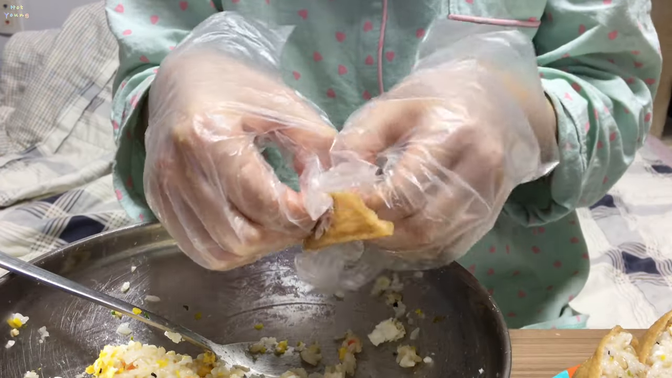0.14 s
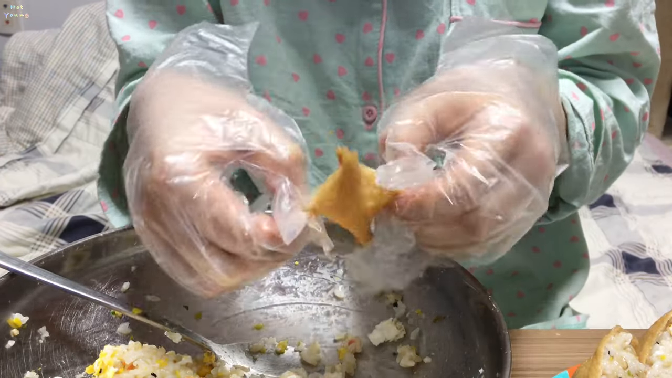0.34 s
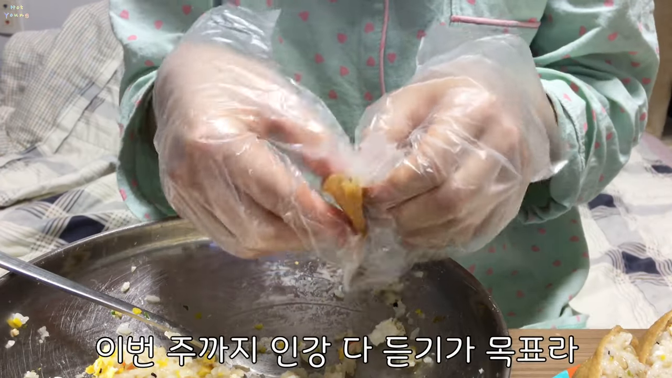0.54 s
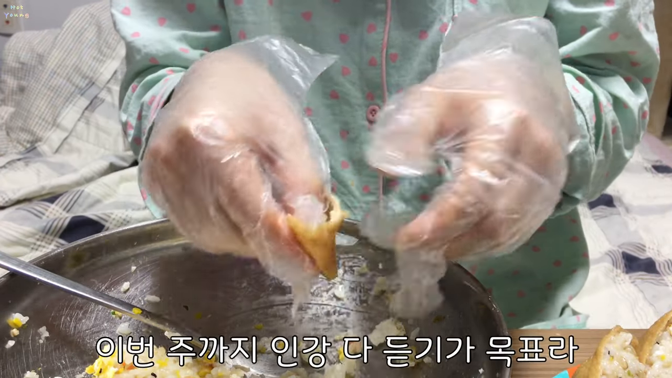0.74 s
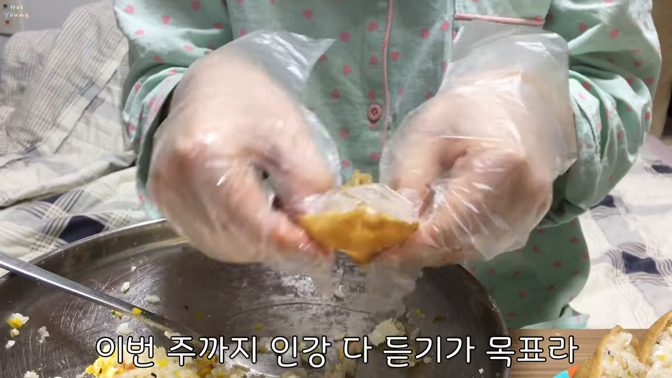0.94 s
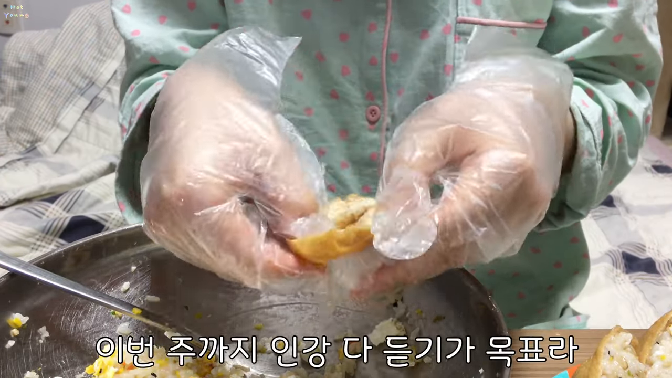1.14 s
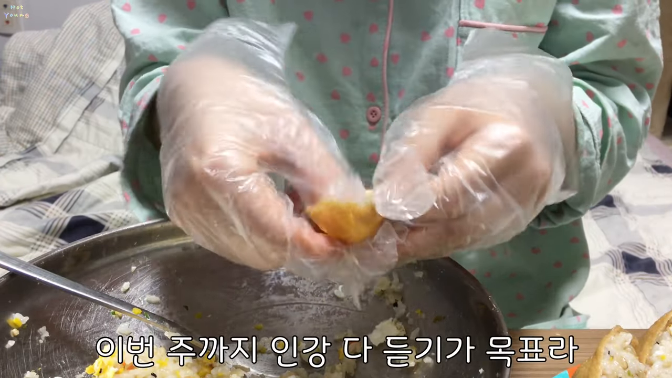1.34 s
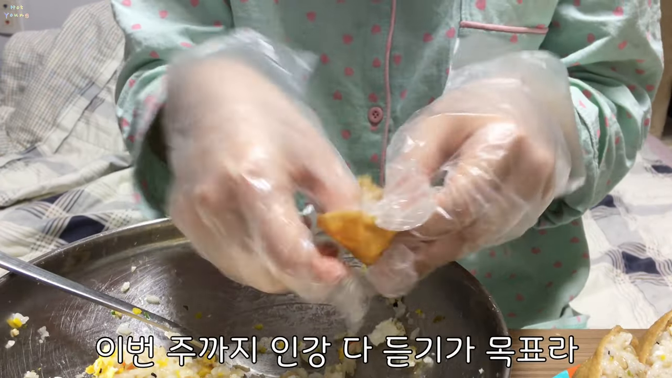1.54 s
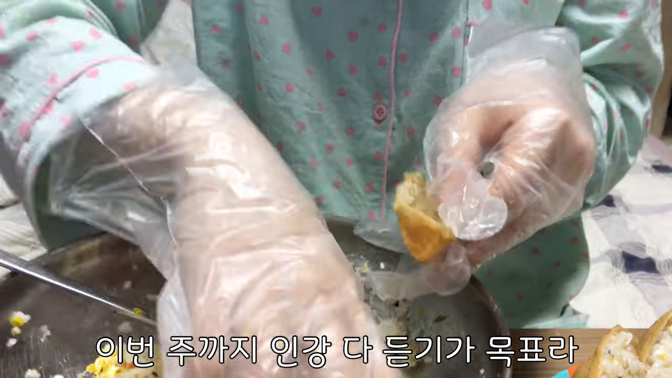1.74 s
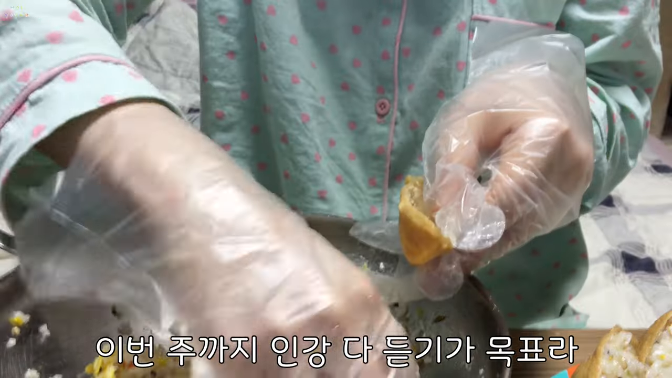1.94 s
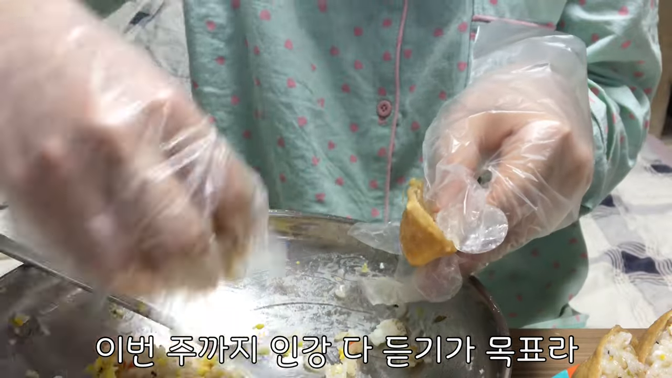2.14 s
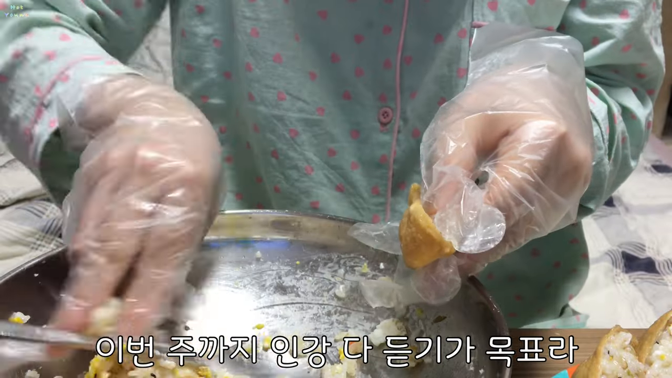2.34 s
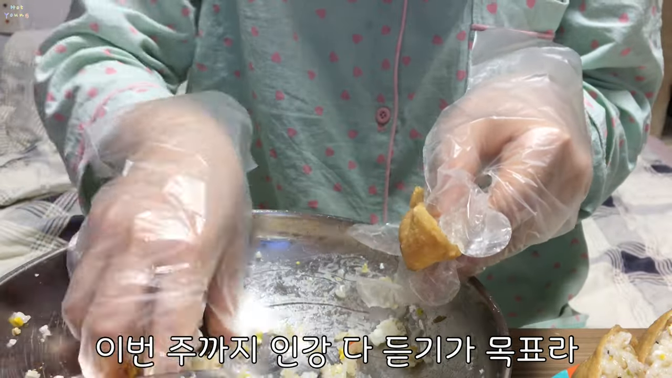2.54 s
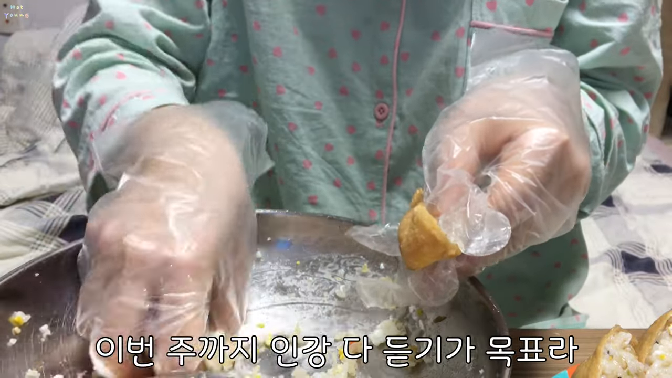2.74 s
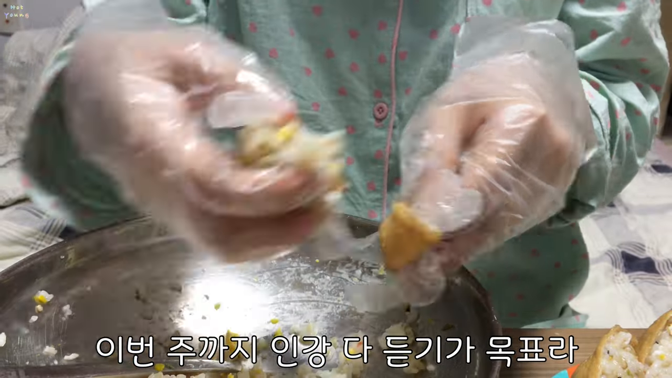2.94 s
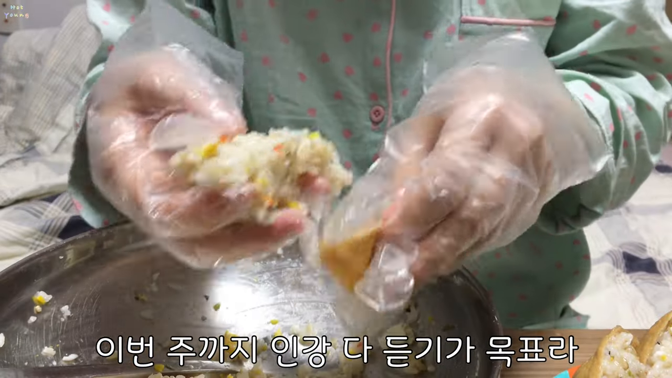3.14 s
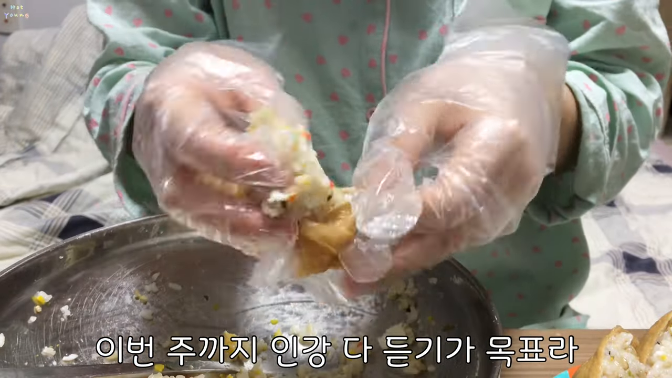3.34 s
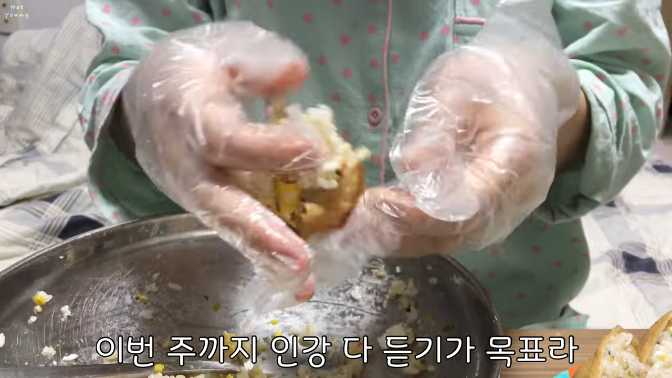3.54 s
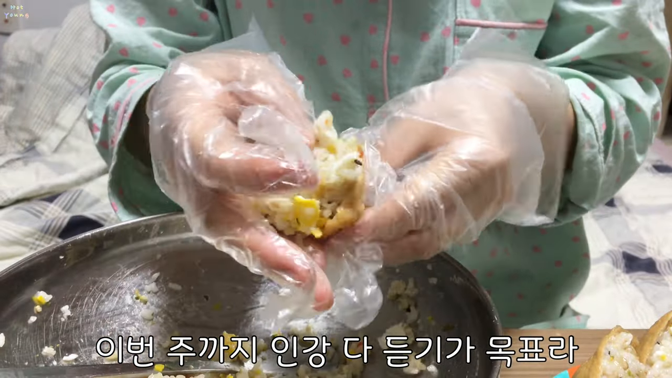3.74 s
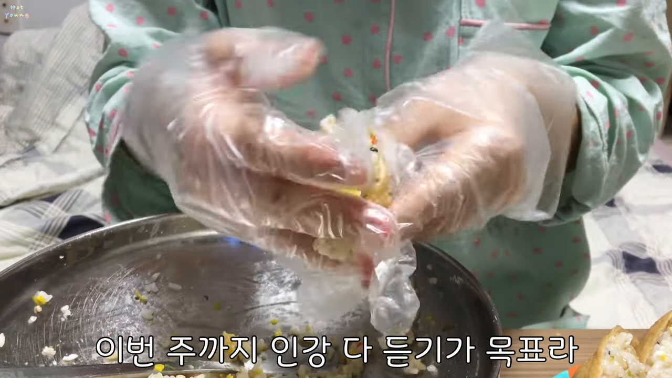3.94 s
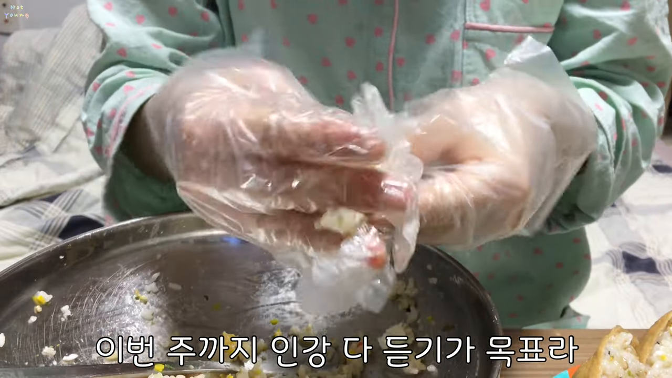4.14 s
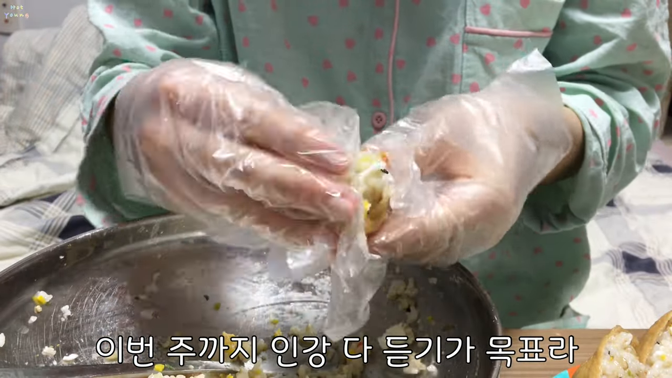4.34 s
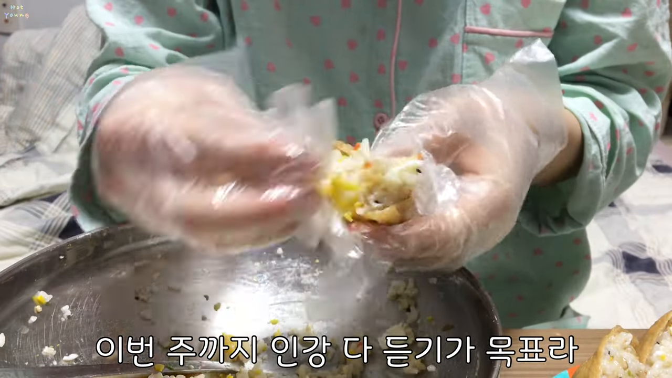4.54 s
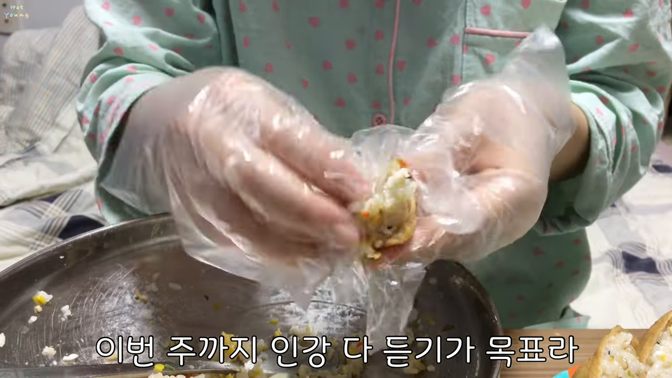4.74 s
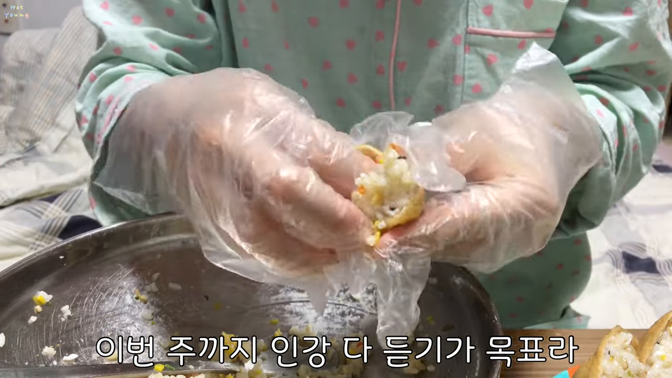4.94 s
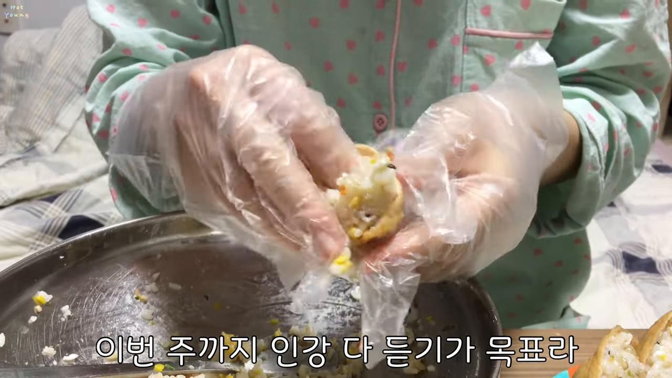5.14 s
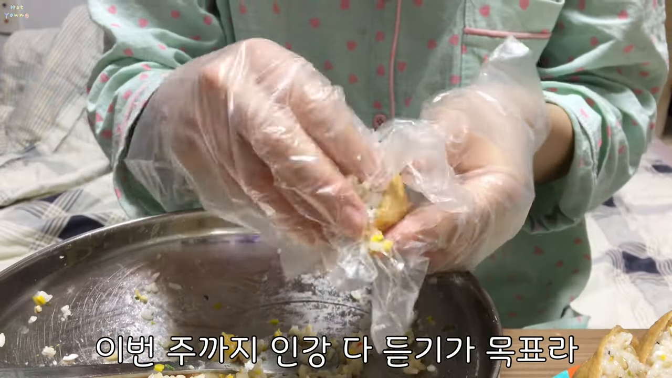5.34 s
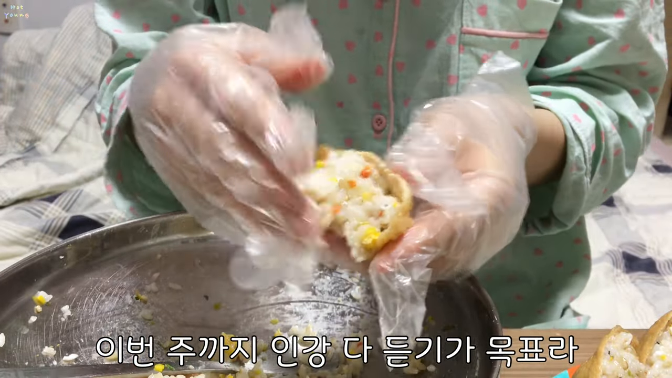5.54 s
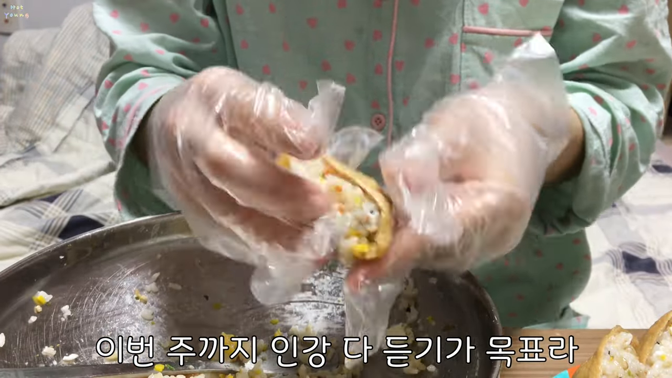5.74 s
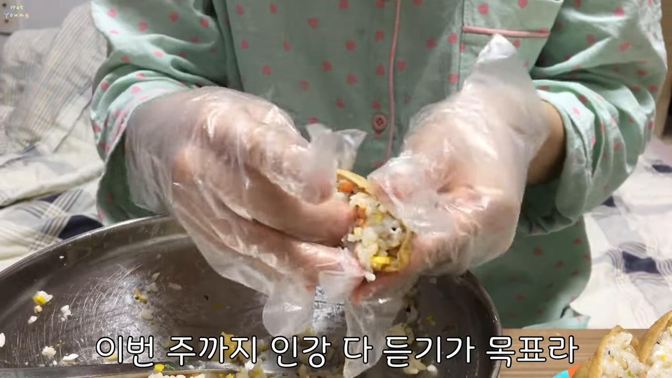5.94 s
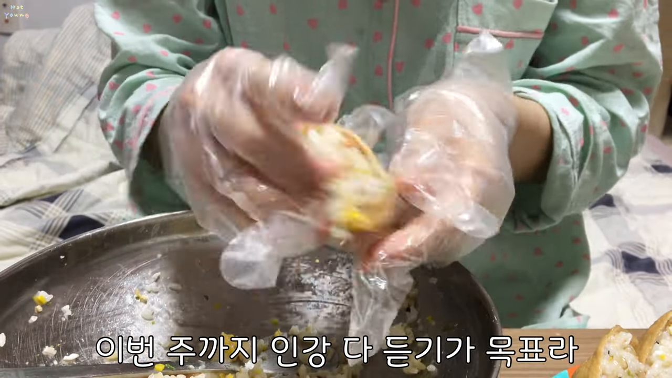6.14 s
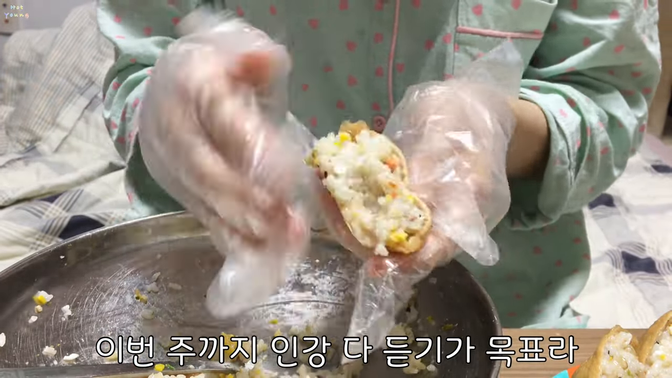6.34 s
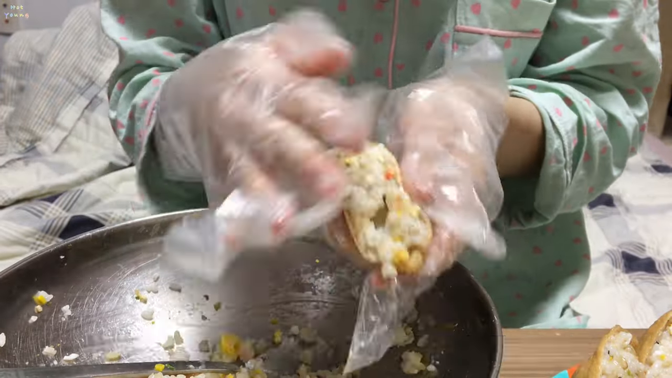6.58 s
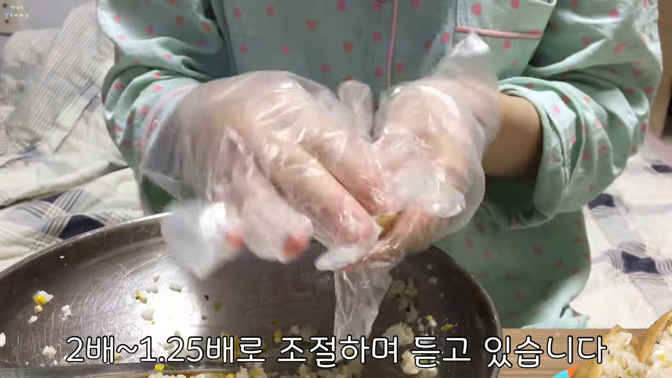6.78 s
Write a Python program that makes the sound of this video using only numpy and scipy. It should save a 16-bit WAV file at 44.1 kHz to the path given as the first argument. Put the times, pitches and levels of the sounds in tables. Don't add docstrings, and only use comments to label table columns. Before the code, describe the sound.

Gloved hands work food over a steel bowl in a small, quiet room, miked closely and dryly. Fine film crackle comes in uneven bursts. A quick metal clatter peaks in one bright, short knock, followed by faint spoon ticks. Rice grains part stickily for half a second, then crinkling returns, livelier, over faint low arm rumble and a distant fridge hum.

```python
import sys
import numpy as np
from scipy import signal
from scipy.fft import rfft, irfft
from scipy.io import wavfile
from scipy.ndimage import uniform_filter1d

SR = 44100
rng = np.random.default_rng(int(sys.argv[2]) if len(sys.argv) > 2 else 0)


def put_to_file(sound):
    columns = np.atleast_2d(sound).T
    safe = np.clip(columns, -1, 1)
    whole_steps = np.round(safe * 32767)
    wavfile.write(sys.argv[1], SR, whole_steps.astype(np.int16))


def boost(x):
    u = np.asarray(x, float) / 20
    return 10 ** u


N = 300321

# [t/s, crinkle level/dB]
HAND_EFFORT = [(0.0, -50.5), (1.5, -50), (1.75, -43.5), (2.05, -52.4), (2.3, -47.5), (2.6, -47.5),
               (3.2, -50.5), (3.6, -44.5), (4.4, -47), (5.0, -48), (5.7, -46), (6.81, -46)]
# [t/s, rise/dB, length/s]
SQUEEZES = [(0.005, 3.5, 0.11), (0.118, 4, 0.04), (0.379, 10.5, 0.12), (0.522, 4.5, 0.15), (0.677, 5, 0.25),
            (0.939, 4.5, 0.29), (1.099, 5, 0.099), (1.58, 4.5, 0.108), (1.746, 2.5, 0.3),
            (1.921, 2.5, 0.088), (2.308, 6.5, 0.031), (2.383, 4.5, 0.31), (2.602, 3.0, 0.2),
            (2.945, 1, 0.14), (3.782, 2.5, 0.043), (3.944, 4, 0.079), (4.202, 3, 0.19), (4.393, 5, 0.16),
            (4.644, 6, 0.1), (4.761, 4, 0.21), (5.092, 6, 0.129), (5.192, 8, 0.057), (5.235, 3, 0.096),
            (5.285, 3, 0.045), (5.516, 5, 0.044), (5.724, 6, 0.091), (6.0, 1, 0.056), (6.419, 4, 0.28),
            (6.651, 1, 0.073), (6.761, 2.5, 0.039)]
# [t/s, drop/dB, length/s]
RESTS = [(0.21, 12, 0.034), (0.325, 9, 0.2), (0.776, 4.7, 0.034), (1.158, 3, 0.041), (1.52, 7.6, 0.12),
         (1.639, 4.5, 0.12), (2.133, 9, 0.032), (2.164, 12, 0.26), (2.364, 2.5, 0.076), (2.658, 6.5, 0.058),
         (2.88, 3.5, 0.17), (3.187, 2.5, 0.172), (3.768, 1, 0.16), (3.842, 1.5, 0.23), (4.014, 11, 0.02),
         (4.583, 3, 0.23), (5.334, 3, 0.082), (5.894, 5.5, 0.18), (6.035, 4.8, 0.11), (6.118, 8, 0.048),
         (6.272, 4.5, 0.043), (6.539, 5.5, 0.064), (6.7, 6.5, 0.091)]
# [t/s, level/dB]
PALM_PRESSURE = [(0, 1), (.6, 0.5), (1.4, 3.5), (1.7, 0), (2.3, 3.5), (3, -1), (4.3, -1), (4.45, 1.5),
                 (4.75, -1), (5.1, 0), (5.5, -1), (5.8, 1), (6.81, -2)]
# [t/s, dull rubbing level/dB, length/s]
PALM_RUBS = [(.03, 3.5, 0.042), (.86, 2.5, 0.11), (1.03, 2.5, 0.17), (2.08, 8, 0.11), (2.55, 4, 0.17),
             (3.05, 5.5, 0.11), (3.42, -4, 0.27), (4.1, 3, 0.47), (4.75, 2, 0.29), (5.1, 1, 0.15),
             (5.75, 3, 0.37), (6.06, 2, 0.23), (6.43, 1.5, 0.19), (6.58, 4, .12)]
# [f/Hz, level per Hz/dB]
FILM_COLOUR = [(200, -17.5), (900, -8), (1200, -9.5), (2300, -7.5), (3200, 1.5), (3900, -2), (4800, 2),
               (5300, -0.5), (5900, 1.5), (7000, 0.5), (8000, 1.5), (11000, 2.5), (15800, -0.5)]
# [t/s, peak level/dB, pitch f/Hz]
SNAPS = [(0.1053, -25, 7800), (0.1232, -29, 8500), (0.1485, -27, 10300), (0.3115, -35, 5900),
         (0.3514, -29.5, 9600), (0.4585, -28.5, 8700), (0.5636, -30, 10200), (0.6345, -27, 7500),
         (0.7059, -26, 7100), (1.0978, -28, 12900), (1.608, -27, 12700), (1.6702, -29, 13400),
         (1.758, -25, 13200), (1.87, -27, 10300), (3.4722, -29, 9400), (3.7794, -28, 9300),
         (3.899, -28, 8800), (4.3249, -27, 9000), (4.5091, -29, 10900), (4.6622, -27, 13500),
         (4.7513, -27, 10800), (5.0939, -24, 9000), (5.19, -23, 11300), (5.3275, -25, 10800),
         (5.6508, -27, 12100), (5.7994, -27, 6100), (5.9212, -29, 12400), (6.0018, -27, 9500),
         (6.0793, -26, 11600), (6.7817, -26, 11000)]
# [f/Hz, level per Hz/dB]
RICE_COLOUR = [(2100, -34), (2550, -15), (3250, 0), (3700, -1.5), (4500, -1.5), (5150, -7), (5600, -4),
               (6300, -11), (7500, -28)]
# [t/s, peak level/dB, pitch f/Hz]
RICE_POPS = [(2.3119, -22, 4500), (2.3186, -26, 4300), (2.352, -28, 4100), (2.4075, -24, 4300),
             (2.4214, -27, 5300), (2.4315, -28, 3400), (2.5293, -29, 4700), (2.6166, -24, 3500),
             (2.6218, -21, 3700), (2.6467, -27, 4500), (2.7123, -28, 4800), (2.7341, -25.5, 4000),
             (2.769, -25, 4700), (2.7986, -26, 5300), (2.8313, -26, 5300)]
# [t/s, spoon level/dB, rim level/dB, belly level/dB, table thump level/dB]
KNOCKS = [(1.7595, -58, -34, -38, -31.5), (1.7689, -20.5, -29, -33.5, -54), (1.779, -46, -50, -36, -45),
          (1.873, -58, -64, -57, -57), (1.9415, -55, -43, -44, -56), (1.9494, -8, -15.5, -24.5, -46),
          (1.956, -19, -24.5, -39, -56), (1.963, -30, -25.5, -32, -73), (2.2748, -31, -42, -46, -57),
          (2.285, -23, -31.5, -33.5, -60), (2.342, -52, -46, -39.5, -75), (2.349, -52, -36, -48.5, -60),
          (5.245, -60, -60, -52, -73)]
# [f/Hz, level/dB, time to fall 60 dB/s]
SPOON_TONES = [(8359, 0, .052), (8470, -7, .045), (8918, -6, .029), (9510, -9, .05), (9598, -4, .055),
               (10016, 2, .035), (10260, -9, .03), (10691, -9, .08)]
# [f/Hz, level/dB, time to fall 60 dB/s]
RIM_TONES = [(1600, -1, .03), (2090, -11, .03), (2800, -3, .04), (3800, -11, .026), (4400, -13, .027),
             (5010, -8, .06), (5895, -9, .06), (6207, -1, .045), (6665, -8, .05), (7773, -6, .05),
             (12870, -7, .045), (14350, -6, .04), (14760, -5, .05), (15400, -1, .04)]
# [f/Hz, level/dB, time to fall 60 dB/s]
BELLY_TONES = [(552, 3, .16), (718, -3, .13), (830, -10, .07), (940, -13, .05), (3240, -6, .06)]
# [f/Hz, level/dB, time to fall 60 dB/s]
FOOT_TONES = [(273, -2, 0.027), (360, 2, 0.064), (460, -1, 0.03)]
# [f/Hz, level/dB, time to fall 60 dB/s]
TABLE_TONES = [(75, -10, .08), (121, 12, 0.098), (187, -1, 0.045)]
# [t/s, rumble level/dB, length/s]
LEANS = [
    (2.05, 12, 0.17),
    (2.25, -1, .15),
    (2.75, 13, 0.21),
    (4.35, 10, 0.14),
    (4.68, 14, 0.14),
    (5.2, 4, .3),
    (6.5, -11, 0.53),
]
# [f/Hz, level per Hz/dB]
AIR_COLOUR = [(25, -32), (95, -19), (150, 15), (260, 6.5), (550, 6), (800, 8), (2500, -19), (6000, -22),
              (7500, -23), (9500, -32), (12000, -2), (13200, 10.5), (16000, -5)]
# [f/Hz, width/Hz, level/dB]
FRIDGE_HUM = [(258, 12, -80.5), (330.5, 9, -82.5), (408.6, 2, -94.5), (993, 15, -81)]
# [f/Hz, level/dB]
MICROPHONE = [(11200, 0), (12300, -3), (13300, .5), (14300, 2), (15800, 2.5)]

USUAL_EFFORT_DB = -49
GRIP = 0.56
KNEAD_START_S, KNEAD_END_S = 2.326, 2.87


def evened(x):
    return x / np.sqrt(np.mean(x ** 2) + 1e-20)


def add(mix, at_s, sound):
    part = mix[round(at_s * SR):][:len(sound)]
    part += sound[:len(part)]


def colour(points):
    hz, db = np.transpose(points)
    bins_hz = np.fft.rfftfreq(N, 1 / SR)
    return boost(np.interp(np.log(bins_hz + 1), np.log(hz + 1), db))


def drift(seconds):
    size = int(seconds * SR) + 1
    once = uniform_filter1d(rng.standard_normal(N), size)
    return evened(uniform_filter1d(once, size))


def swells(rows):
    margin_s = 0.5
    out = np.zeros(N + SR)
    for at_s, db, length_s in rows:
        add(out, at_s - length_s / 2 + margin_s, db * np.hanning(int(length_s * SR)))
    return out[SR // 2:][:N]


def ring(tones, freedom, rise_s=0.00039):
    t = np.arange(SR // 5) / SR
    x = np.zeros(len(t))
    for k, (hz, db, t60) in enumerate(tones):
        fading = boost(db - 60 * t / (t60 * freedom))
        x += (-1) ** k * fading * np.sin(2 * np.pi * hz * t)
    return x / abs(x).max() * (1 - np.exp(-t / rise_s))


def gloves():
    return film() + rice() + snaps()


def film():
    t, hz = np.arange(N) / SR, np.fft.rfftfreq(N, 1 / SR)
    film_db = effort()
    extra_db = film_db - USUAL_EFFORT_DB
    press_db = np.interp(t, *np.transpose(PALM_PRESSURE))
    _, progress = kneading()
    spectrum = crackle(creases_per_s(film_db), 2.75, 1.8, 0.4) * colour(FILM_COLOUR)
    above_low = 1 / (1 + (2600 / (hz + 1)) ** 12)
    above_mid = 1 / (1 + (6500 / (hz + 1)) ** 12)
    mid_db = -6 + press_db - 0.04 * extra_db
    rub_db = -13 + 0.22 * press_db - 0.077 * extra_db + swells(PALM_RUBS)
    rub_db = rub_db - 6.5 * progress
    bright = evened(irfft(spectrum * above_mid, N))
    middle = evened(irfft(spectrum * (above_low - above_mid), N))
    rubbing = evened(irfft(spectrum * (1 - above_low), N))
    return boost(film_db) * (bright + middle * boost(mid_db) + rubbing * boost(rub_db))


def rice():
    film_db = effort()
    knead, progress = kneading()
    grains = crackle(creases_per_s(film_db) / 2, 3.1, 1.8, 0.9, count=20)
    parting = evened(irfft(grains * colour(RICE_COLOUR), N))
    belly = evened(irfft(grains * rfft(ring(BELLY_TONES, GRIP), N), N))
    return boost(film_db) * knead * (parting * boost(-4.5 + 4.5 * progress) + belly * boost(-23))


def snaps():
    out = np.zeros(N)
    for rows, cycles in ((SNAPS, 0.9), (RICE_POPS, 2.4)):
        for at_s, db, pitch_hz in rows:
            add(out, at_s, boost(db - 2.0) * crease(pitch_hz, cycles))
    return signal.sosfilt(signal.butter(2, 2200, "high", fs=SR, output="sos"), out)


def effort():
    db = np.interp(np.arange(N) / SR, *np.transpose(HAND_EFFORT)) + swells(SQUEEZES) - swells(RESTS)
    shower_db = 1.5 * np.exp(-np.arange(SR // 10) / SR / 0.01)
    for at_s, _, _ in SNAPS:
        add(db, at_s, shower_db)
    return db


def kneading():
    t = np.arange(N) / SR
    rise, fall = (t - KNEAD_START_S) / 0.11, (KNEAD_END_S - t) / 0.046
    knead = np.clip(np.minimum(rise, fall), 0, 1)
    return knead, knead * (t - KNEAD_START_S) / (KNEAD_END_S - KNEAD_START_S)


def creases_per_s(film_db):
    return np.clip(10000 * boost(0.8 * (film_db - USUAL_EFFORT_DB)), 2500, 20000)


def crackle(per_s, spread_db, clump_db, patch_db, count=28):
    clumps = boost(clump_db * drift(0.004) + 0.45 * drift(0.015))
    strength = boost(spread_db * np.minimum(rng.exponential(1, N), 3.8))
    happens = rng.random(N) < per_s / SR
    size = strength * happens * clumps / np.sqrt(per_s)
    facet = rng.integers(0, count, N)
    ticks = size * rng.choice([-1., 1.], N)
    folds = [boost(patch_db * drift(0.063)) for _ in range(count // 4)]
    x = 0.44 * ticks
    for k, hz in enumerate(np.geomspace(500, 15000, count)):
        facet_sound = crease(hz, 0.93 + hz / 8000) * (hz / 4000) ** 0.58
        x += signal.oaconvolve(ticks * folds[k // 4] * (facet == k), facet_sound)[:N]
    z = rfft(x)
    return z / np.sqrt(uniform_filter1d(abs(z) ** 2, size=2000))


def crease(hz, cycles):
    turns = np.arange(400) * hz / SR
    x = np.sin(2 * np.pi * turns) * np.exp(-turns / cycles) * (1 - np.exp(-turns / 0.2))
    return x / abs(x).max()


def knocks():
    out, t = np.zeros(N), np.arange(SR // 20) / SR
    dull = signal.butter(2, (300, 800), "band", fs=SR, output="sos")
    for at_s, spoon_db, rim_db, belly_db, thump_db in KNOCKS:
        noise = rng.standard_normal(len(t))
        crack = signal.lfilter([1, -0.8], 1, noise * np.exp(-t / 0.0084))
        clatter = signal.sosfilt(dull, noise * np.exp(-t / 0.0047))
        add(out, at_s, boost(spoon_db) * ring(SPOON_TONES, GRIP))
        add(out, at_s, boost(rim_db) * ring(RIM_TONES, GRIP))
        add(out, at_s, boost(belly_db) * ring(BELLY_TONES, GRIP, 0.00064))
        add(out, at_s, boost(thump_db) * ring(TABLE_TONES, 1, 0.018))
        add(out, at_s, boost((rim_db + thump_db) / 2 - 2) * ring(FOOT_TONES, 0.67, 0.00072))
        add(out, at_s, boost(rim_db - 6.5) * crack)
        add(out, at_s, boost(thump_db + 18) * clatter)
    return out


def reflections(x):
    t60, gap_s, count = 0.075, 0.0015, 6
    t, out = np.arange(SR // 8) / SR, np.zeros(N)
    place = np.arange(N) / (0.012 * SR) % count
    for k in range(count):
        echoes = rng.choice([-1., 1.], len(t)) * (rng.random(len(t)) < 0.15)
        taps = echoes * boost(-60 * t / t60) * (t > gap_s)
        away = np.minimum(abs((place - k + count / 2) % count - count / 2), 1)
        out += signal.oaconvolve(x * np.cos(away * np.pi / 2), taps / np.linalg.norm(taps))[:N]
    return out


def forearms():
    still_db = -18 * (np.arange(N) / SR < 1.7)
    db = -81.5 + still_db + 0.27 * (effort() - USUAL_EFFORT_DB) + 5.5 * drift(0.046) + swells(LEANS)
    low = colour([(40, -20), (75, -4), (150, 3), (230, -3.0), (400, -28)])
    rumble = irfft(rfft(rng.standard_normal(N)) * low, N)
    return evened(rumble) * boost(db)


def room_tone():
    hz, z = np.fft.rfftfreq(N, 1 / SR), rfft(rng.standard_normal(N))
    out = boost(-66.5) * evened(irfft(z * colour(AIR_COLOUR), N))
    for centre_hz, width_hz, db in FRIDGE_HUM:
        band = z / (1 + (2 * (hz - centre_hz) / width_hz) ** 2)
        out += boost(db) * evened(irfft(band, N))
    return out


def scene():
    near = gloves() + knocks()
    mono = near + reflections(boost(-8.0) * near) + forearms() + room_tone()
    return np.array([mono, mono])


def band_limit(x):
    return signal.sosfilt(signal.butter(12, 16830, fs=SR, output="sos"), x)


def record(dry):
    thin = signal.sosfilt(signal.butter(4, 76, "high", fs=SR, output="sos"), dry)
    heard = irfft(rfft(thin) * colour(MICROPHONE), N)
    top_cut = signal.firwin(511, 15850, window=("kaiser", 9), fs=SR)
    mix = signal.oaconvolve(heard, top_cut[None], "same")
    return band_limit(mix)


dry = scene()
out = record(dry)
put_to_file(out)
```